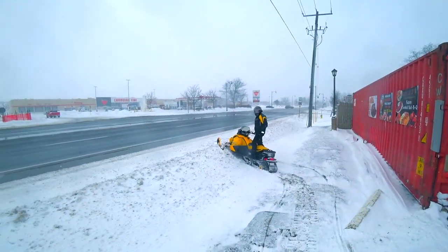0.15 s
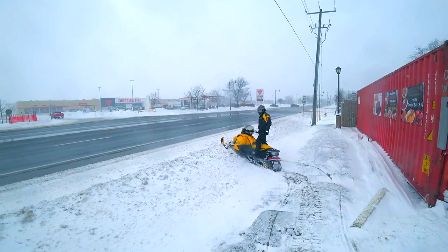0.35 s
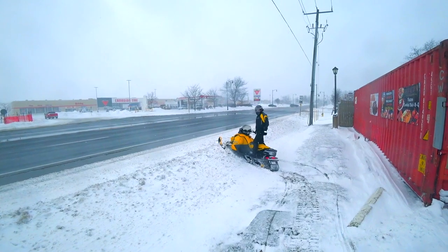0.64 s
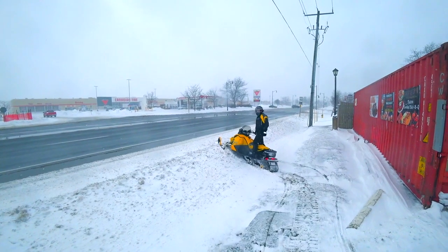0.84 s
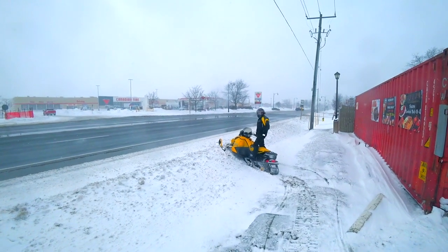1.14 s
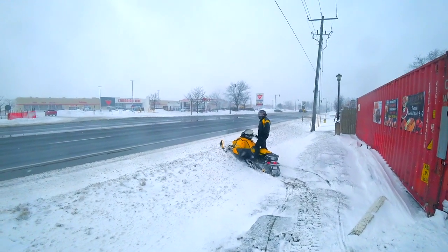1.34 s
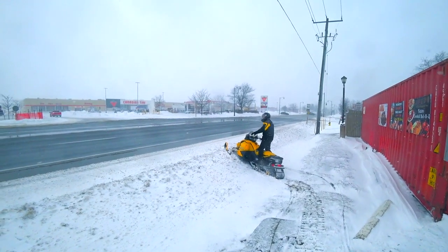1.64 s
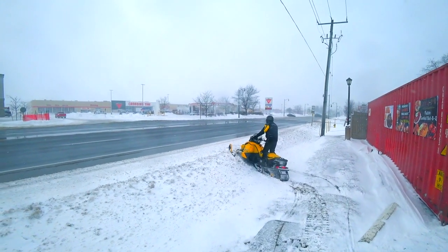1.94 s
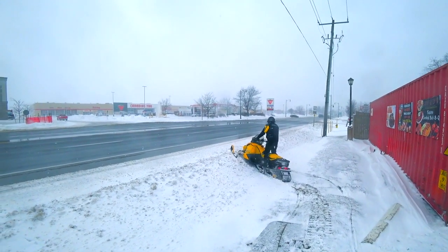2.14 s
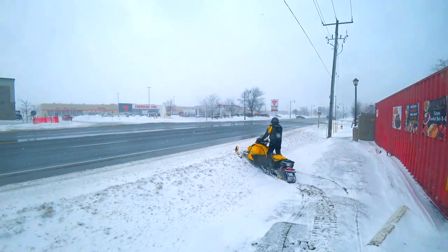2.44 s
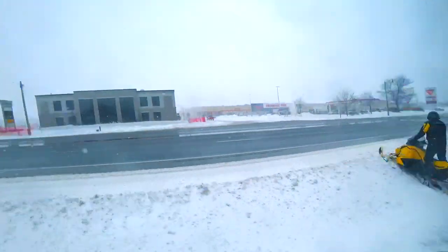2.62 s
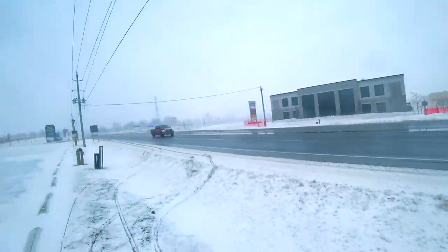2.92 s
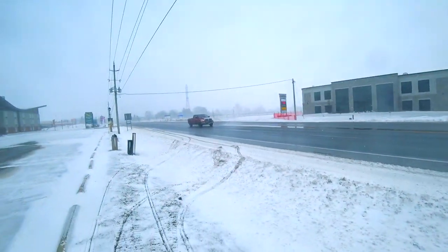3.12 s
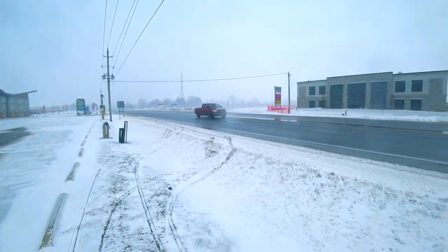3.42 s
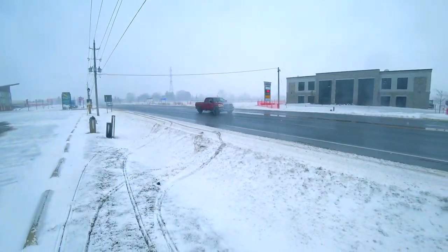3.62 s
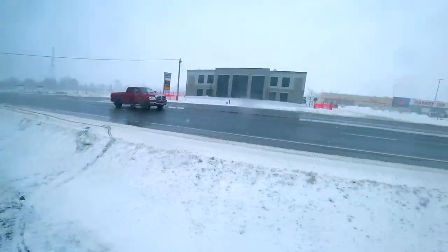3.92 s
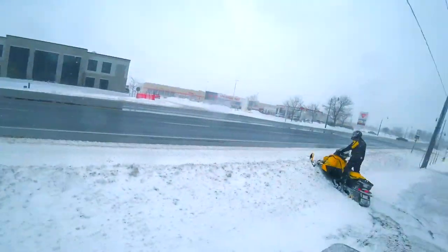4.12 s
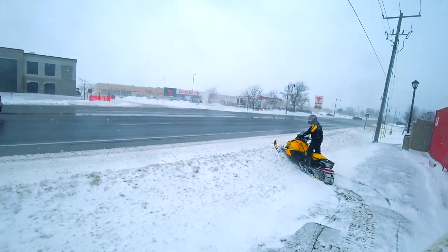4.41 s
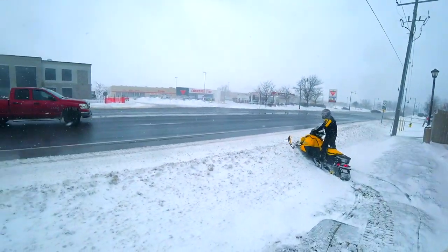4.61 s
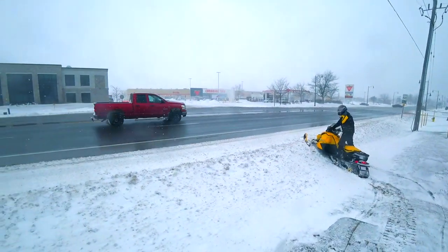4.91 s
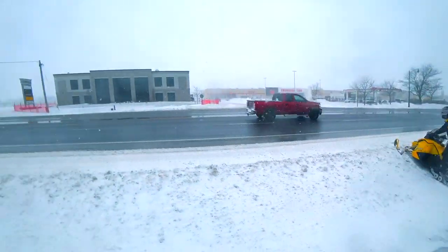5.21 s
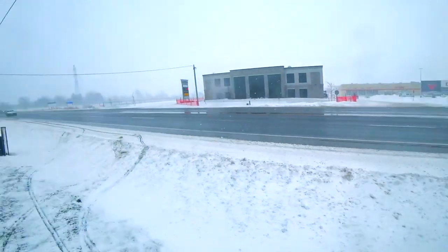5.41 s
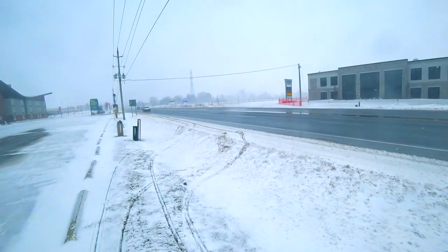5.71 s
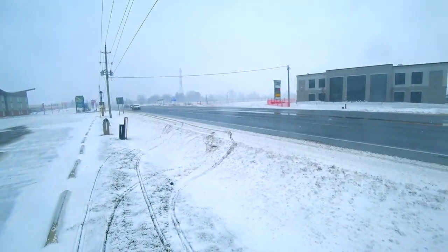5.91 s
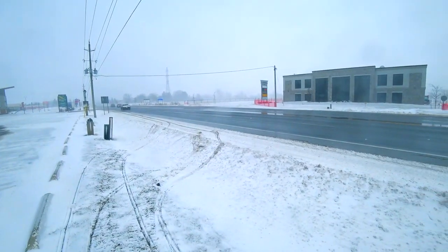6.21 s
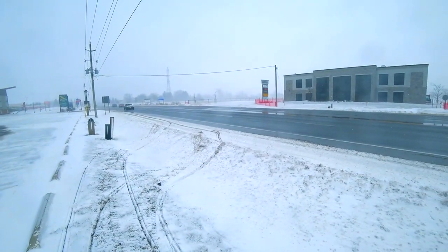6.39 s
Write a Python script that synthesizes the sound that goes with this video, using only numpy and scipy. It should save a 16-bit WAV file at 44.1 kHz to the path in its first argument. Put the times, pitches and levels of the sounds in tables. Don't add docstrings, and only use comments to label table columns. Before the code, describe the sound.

A two-stroke snowmobile engine idles throughout, a bassy thump about forty beats a second over a growling casing. Tyres hiss faintly on a wet, snowy road. The wearer's microphone sits under cloth: a rustle and sharp snap near 2.8 seconds briefly choke the sound, another cluster at 3.9 half covers it, and a last snap at 5.5 springs it open, brightest.

```python
import sys
import numpy as np
from scipy import signal
from scipy.fft import rfft, irfft, next_fast_len
from scipy.io import wavfile
from scipy.ndimage import uniform_filter1d, map_coordinates

SR = 44100
rng = np.random.default_rng(int(sys.argv[2]) if len(sys.argv) > 2 else 0)


def generate_wav(signal):
    frames = np.transpose(np.atleast_2d(signal))
    scaled = np.clip(frames, -1, 1) * 32767
    pcm = np.round(scaled).astype(np.int16)
    wavfile.write(sys.argv[1], SR, pcm)


def elevation(decibels):
    levels = np.asarray(decibels, float)
    return 10 ** (levels / 20)


N = 288855


def unit(x):
    return x / np.sqrt(np.mean(x ** 2) + 1e-20)


def along(points, hz):
    f, v = np.transpose(points)
    return np.interp(np.log(hz + 1), np.log(f + 1), v)


def curves(rows):
    s, *cols = np.transpose(rows)
    return [np.interp(np.arange(N) / SR, s, c) for c in cols]


def wobble(rate):
    knots = rng.standard_normal(int(N * rate / SR) + 4)
    return map_coordinates(knots, [np.arange(N) * rate / SR])


def filtered(x, response):
    m = next_fast_len(N + SR // 2)
    return irfft(rfft(x, m) * response(np.fft.rfftfreq(m, 1 / SR)), m)[..., :N]


def patches(shape, bands, frames):
    field = uniform_filter1d(rng.standard_normal(shape), bands, 0)
    return unit(uniform_filter1d(field, frames, 1))


def rush(spectrum, patchy_db):
    z = signal.stft(rng.standard_normal(N + 512), nperseg=512)[2]
    gain = elevation(patchy_db * patches(z.shape, 4, 12))
    noise = signal.istft(z * gain, nperseg=512)[1][:N]
    return unit(filtered(noise, lambda hz: elevation(along(spectrum, hz))))


def firings(turns):
    at = np.flatnonzero(np.diff(np.floor(turns)) > 0)
    luck = rng.standard_normal((len(at), 3))
    cylinder = (-1) ** np.arange(len(at))
    late = SR * (0.000058 * cylinder * (1 + wobble(1.5)[at]) + 0.00047 * luck[:, 0])
    weak_db = 1.7 * np.maximum(luck[:, 2] - 1.1, 0)
    size_db = 0.14 * cylinder + 0.8 * luck[:, 1] - weak_db
    pulses = np.zeros(N)
    pulses[np.clip(at + late, 0, N - 1).astype(int)] = elevation(size_db)
    return pulses


# (f/Hz, level/dB)
PIPE = [(12, -38.5), (25, -22.5), (40, -4), (80, 0), (120, 0.5), (160, -8.5), (200, -33), (280, -36),
        (470, -41), (900, -62.5), (2500, -120)]


def exhaust_thump(pulses):
    def pipe(hz):
        lead = np.exp(2j * np.arctan(23 / (hz + 1)) - 2j * np.pi * hz * 0.0009)
        return elevation(along(PIPE, hz)) * lead

    exhaust = filtered(pulses, pipe)
    thump = 0
    for k in range(1, 6):
        share = lambda hz: np.clip(1 - abs(np.clip(hz / 40.3, 1, 5) - k), 0, 1)
        thump = thump + elevation(1.7 * wobble(7)) * filtered(exhaust, share)
    return unit(thump)


# (multiple of the firing rate, level/dB re thump)
HUM = [(6, -29), (7, -29), (9, -34), (10, -28), (15, -38)]


def pipe_hum(turns):
    hum = 0
    for k, db in HUM:
        level = elevation(db + 1.3 * wobble(4))
        hum = hum + level * np.sin(2 * np.pi * k * turns + 0.35 * wobble(5))
    return hum


# (t/s, firings so far)
CRANK = [(-.022, -1), (.3478, 14), (.7231, 29), (1.2196, 49), (1.347, 54), (2.0943, 84), (2.338, 94),
         (2.7114, 109), (3.3396, 134), (3.4623, 139), (3.8373, 154), (4.4581, 179), (4.5853, 184),
         (4.7104, 189), (4.9547, 199), (6.0767, 244), (6.3291, 254), (6.5735, 264)]
# (t/s, level/dB over its usual idle)
EFFORT = [(0, -0.5), (.75, -1.5), (1.2, 0.04), (2.24, 0.5), (2.6, -1.5), (3.3, 1.5), (3.88, 1), (4.4, 1),
          (5.3, 0.2), (5.85, 0), (6.36, 1.5), (6.55, .5)]
# (f/Hz, level/dB per Hz)
GROWL = [(110, -41), (190, 2), (231, -2.5), (258, -6), (284, -1), (312, -4), (410, -8), (437, -9),
         (457, -8.5), (560, -15.5), (617, -14.5), (676, -16.5), (900, -31), (1170, -57.5), (1980, -120)]
# (f/Hz, level/dB per Hz)
RUMBLE = [(3, -18), (12, -10), (22, -3), (33, -2), (52, -5), (66, 0), (100, 0), (135, -6), (155, -2),
          (175, -11), (260, -30), (600, -120)]
# (f/Hz, level/dB per Hz)
ROAR = [(470, -1), (800, -2.5), (936, -5.5), (1170, -3), (2000, -17.5), (2600, -66.5), (4400, -120)]
# (open level/dB, half-covered level/dB, wide-open level/dB)
THUMP_IN = (4.24, -0.15, 4.47)
GROWL_IN = (4.35, 0.6, 5.9)


def engine():
    turns, = curves(CRANK)
    effort_db, = curves(EFFORT)
    thump_db = -17 + effort_db + let_in(THUMP_IN)
    own_db = -37 + 1.4 * effort_db + let_in(GROWL_IN) + 1.4 * wobble(5)
    growl_db = 10 * np.log10(elevation(2 * own_db) + elevation(2 * outside()[0]))

    pulses = firings(turns)
    rumble = elevation(-12 + 2.2 * wobble(4)) * rush(RUMBLE, patchy_db=0.9)
    low = exhaust_thump(pulses) + pipe_hum(turns) + rumble

    t = np.arange(1300) / SR
    swell = np.exp(-((t - 0.0115) / 0.0031) ** 2)
    puff = signal.fftconvolve(pulses, swell)[441:][:N]
    growl = unit(rush(GROWL, patchy_db=0.65) * (1.5 + 0.5 * puff) * elevation(0.25 * wobble(13)))
    bursts = 0.5 + puff ** 2 * elevation(2.1 * wobble(30))
    clatter = unit(rush(ROAR, patchy_db=1.5) * bursts)
    return elevation(thump_db) * low + elevation(growl_db - 0.3) * growl + elevation(growl_db - 17.5) * clatter


# (t/s, peak level/dB)
POPS = [(0.646, -32), (0.724, -38), (0.824, -37), (1.843, -34), (1.918, -36), (1.996, -35), (2.411, -35),
        (2.652, -29), (3.112, -34), (3.238, -27), (3.535, -26), (3.611, -30), (3.785, -28), (4.897, -32),
        (5.876, -27), (5.902, -28), (6.024, -26), (6.101, -28), (6.227, -26), (6.498, -29)]


def pops():
    kicks = np.zeros(N)
    for s, db in POPS:
        kicks[round((s + 0.001) * SR)] = elevation(db + 39)

    def mode(hz, centre_hz, width_hz):
        return 1j * hz * width_hz / (centre_hz ** 2 - hz ** 2 + 1j * hz * width_hz)

    def shell(hz):
        ring = mode(hz, 590, 150) + 0.07 * mode(hz, 1200, 500)
        return ring / (1 + (hz / 1150) ** 4)

    return filtered(kicks, shell)


# (t/s, roar level/dB)
TYRES = [(0, -58), (.25, -55), (.8, -55.5), (1.55, -52.5), (1.96, -51.5), (2.42, -53), (2.94, -51.5),
         (3.25, -48.5), (3.8, -50.5), (4.17, -47), (4.6, -49.5), (4.8, -56.5), (5.5, -52.5), (5.9, -50),
         (6.1, -52), (6.38, -47.5), (6.55, -55)]
# (t/s, hiss level/dB)
RUB = [(2.4, -80), (2.49, -60), (2.67, -50), (2.81, -50.5), (2.9, -69), (3.25, -65), (3.66, -55.5),
       (3.82, -55), (3.89, -48.5), (4.02, -56.5), (4.17, -63), (4.4, -68.5), (4.78, -55.5), (5.0, -56),
       (5.17, -53), (5.35, -51.5), (5.51, -48.5), (5.65, -63)]
# (open level/dB, half-covered level/dB, wide-open level/dB)
ROAD_IN = (5.8, 9.4, 10.6)
# (level/dB at usual tyre level, growth with the tyres, level/dB over the rubbing)
LAYERS = [
    (-58, 0.01, 13.5),
    (-55, 1.01, 8),
    (-70, 0.73, -0.3),
    (-74, 0.73, -8),
    (-78, 0.69, -19),
]


def outside():
    (tyres_db,), (rub_db,) = curves(TYRES), curves(RUB)
    near_db = tyres_db + let_in(ROAD_IN) + 54
    levels = []
    for db, grows, over_db in LAYERS:
        power = elevation(2 * (db + grows * near_db)) + elevation(2 * (rub_db + over_db))
        levels.append(10 * np.log10(power))
    return levels


# (f/Hz, level/dB per Hz)
HISS = [(900, -120), (1600, -13), (2000, -1), (3000, -1), (3800, -4.5), (4600, -13), (7000, -120)]
FIZZ = [(2000, -120), (3400, -10.5), (4200, 3), (5500, 1), (6600, -2), (7800, -16.5), (11000, -120)]
SPRAY = [(4000, -120), (6200, -8.5), (7300, 0), (9000, -3.5), (11000, -7.5), (11300, -120)]


def road():
    _, roar_db, hiss_db, fizz_db, spray_db = outside()
    flutter = wobble(19)
    roar = elevation(roar_db + 0.38 * flutter) * rush(ROAR, patchy_db=1.85)
    hiss = elevation(hiss_db + 0.56 * flutter) * rush(HISS, patchy_db=1.5)
    fizz = elevation(fizz_db + 0.49 * flutter) * rush(FIZZ, patchy_db=0.8)
    spray = elevation(spray_db + 0.6 * flutter) * rush(SPRAY, patchy_db=0.6)
    return roar + hiss + fizz + spray


# (t/s, peak level/dB, length/s, centre f/Hz, top f/Hz)
SNAPS = [(.7493, -44, .0006, 7000, 12500), (.7495, -40, .0012, 4300, 5200), (.76, -45, .00087, 5000, 11600),
         (2.8222, -34, .0012, 3500, 11500), (2.8244, -14, .00004, 4500, 16500),
         (2.832, -31, .0011, 2200, 12300), (3.887, -27.5, .0011, 3980, 12700),
         (3.8887, -23, .0018, 3000, 12700), (3.8921, -16, .00024, 2500, 12600),
         (3.894, -17, .0011, 1300, 12600), (4.073, -42, .0002, 8000, 13500),
         (4.1118, -32, .00006, 3500, 14500), (4.164, -46, .0002, 9000, 13000),
         (5.5389, -27, .00044, 3500, 11100), (5.540, -12, .00006, 4500, 11500),
         (5.5408, -27, .00004, 12000, 16500), (5.794, -37, .00076, 7000, 11000)]
# (t/s, peak level/dB,
# centre f/Hz)
TICKS = [(.746, -45, 4030), (1.0325, -45, 5080), (1.7235, -56, 3000), (2.8015, -40, 6000),
         (2.841, -39, 2000), (2.886, -43, 4000), (2.896, -50, 5000), (2.927, -43, 3000), (2.943, -42, 3000),
         (2.967, -41, 3000), (2.992, -41, 3000), (3.017, -42, 3000), (3.042, -46, 5000), (3.049, -52, 6000),
         (3.057, -45, 2500), (3.9125, -48, 4000), (4.069, -41, 7000), (5.5595, -40, 3000),
         (5.604, -44, 6000), (5.632, -47, 4940), (5.642, -42, 7400), (5.682, -43, 7900), (6.045, -43, 7000)]
# (t/s, peak level/dB, length/s, centre f/Hz)
SCUFFS = [(0.647, -49, .0009, 2000), (1.047, -47, .0008, 2500), (1.385, -39, 0.0023, 1300),
          (2.837, -40, 0.014, 1300), (5.55, -35, 0.014, 1220), (3.902, -35, 0.015, 1230),
          (3.983, -35, 0.00051, 1500), (3.996, -34, 0.0039, 1900), (4.006, -38, 0.002, 3000),
          (4.011, -33, 0.0058, 1930), (4.09, -38, 0.0009, 2000), (4.098, -32, 0.00088, 2500)]


def snaps():
    out = np.zeros(N + SR)
    t = np.arange(-600, 1800) / SR
    hz = np.fft.rfftfreq(len(t), 1 / SR)
    decay_s = np.where(t < 0, 0.012, 0.04)
    ring = elevation(-37 - 60 * abs(t) / decay_s) * np.sin(2 * np.pi * 11100 * t)
    ticks = [(s, db, 0.00012, centre_hz, 11000) for s, db, centre_hz in TICKS]
    scuffs = [(s, db, length, centre_hz, 1.3 * centre_hz) for s, db, length, centre_hz in SCUFFS]
    for s, db, length, centre_hz, top_hz in [*SNAPS, *ticks, *scuffs]:
        ratio = hz / centre_hz
        colour = ratio / (1 + ratio ** 2.18) / (1 + (hz / top_hz) ** 30)
        burst = rng.standard_normal(len(t)) * np.exp(-(t / max(length, 4e-5)) ** 2)
        if length < 0.00045:
            burst[600] += 3
        crackle = irfft(1j * rfft(burst) * colour, len(t))
        out[round(s * SR) - 600:][:len(t)] += elevation(db) * (crackle / abs(crackle).max() + ring)
    return out[:N]


# (f/Hz, rms level/dB)
WHINE = [(10002, -82.5)]


def whine():
    opened, _, wide = port_state()
    t = np.arange(N) / SR
    return sum(elevation(db + 4.0 - 9 * (opened + wide)) * np.sin(2 * np.pi * hz * t) for hz, db in WHINE)


# (t/s, open share, half-covered share, wide-open share)
OPEN = [
    (2.86, 0, 0, 0),
    (2.88, 1, 0, 0),
    (3.9, 1, 0, 0),
    (3.93, 0, 1, 0),
    (5.56, 0, 1, 0),
    (5.59, 0, 0, 1),
]


def port_state():
    return curves(OPEN)


def let_in(gains_db):
    return np.dot(gains_db, port_state())


# (touch t/s, shut t/s, reopen t/s, depth level/dB, closing time/s)
SEALS = [
    (2.806, 2.82, 2.872, 14.5, .014),
    (3.893, 3.893, 3.938, 19, .007),
    (5.513, 5.55, 5.587, 16, .009),
]


def seal():
    t = np.arange(N) / SR
    touch_share = 0.4
    bass_back_s, treble_back_s = 0.013, 0.007
    closing = lambda s, time: 1 - np.exp(-np.maximum(t - s, 0) / time)
    bass_db = treble_db = 0
    for touch, shut, reopen, db, time in SEALS:
        shut_share = closing(shut, time)
        bass_db = bass_db - db * shut_share * (1 - closing(reopen, bass_back_s))
        shade = touch_share * closing(touch, 0.0021) + (1 - touch_share) * shut_share
        treble_db = treble_db - db * shade * (1 - closing(reopen, treble_back_s))
    return bass_db, treble_db


def membrane_squeeze(bass_db):
    def push(hz):
        return (hz / 6) / (1 + (hz / 6) ** 2) * 1j / (1 + (hz / 80) ** 2)

    return filtered(-bass_db, push)


def cavity(x, peaks):
    return filtered(x, lambda hz: elevation(sum(db / (1 + (2 * (hz - c) / w) ** 2) for c, w, db in peaks)))


def band_dropouts(x, level):
    hz, _, z = signal.stft(x, SR, nperseg=1024)
    field = patches(z.shape, 4, 8)
    weak_bands = unit(uniform_filter1d(rng.standard_normal(z.shape[0]), 3)[:, None])
    lean_frames = unit(uniform_filter1d(rng.standard_normal(z.shape[1]), 5))
    bass_safe = (2000 / (hz[:, None] + 1)) ** 3
    need = field + 0.7 * weak_bands + 0.55 * lean_frames - bass_safe
    return signal.istft(z * np.where(need > level, 0.03, 1), nperseg=1024)[1][:N]


# (f/Hz, width f/Hz, level/dB)
MUFFLED = [(780, 100, 2), (1500, 930, -3.5), (2580, 220, 4), (3700, 210, 2), (4600, 270, 3), (5820, 420, 7)]
OPENED = [(249, 150, 2), (606, 200, -3.5), (2530, 200, 2.5), (3860, 430, 4.5), (4500, 300, 1.2),
          (5700, 280, 6)]
WIDE = [(244, 130, 4.2), (600, 250, -5.5), (1500, 410, 3), (2540, 390, 6), (3730, 220, 5), (4580, 560, 10),
        (6000, 700, 7), (7460, 200, 1)]


def port(x):
    opened, half, wide = port_state()
    half_covered = band_dropouts(half * cavity(x, MUFFLED), level=0.7)
    clothed = band_dropouts((1 - opened - half - wide) * x, level=2.1)
    return half_covered + opened * cavity(x, OPENED) + wide * cavity(x, WIDE) + clothed


def scene():
    bass_db, treble_db = seal()
    arriving = elevation(bass_db) * (engine() + pops()) + elevation(treble_db) * road()
    heard = port(arriving) + elevation(treble_db) * whine()
    return (heard + elevation(-41.5) * membrane_squeeze(bass_db) + snaps())[None]


def low_pass(x):
    return signal.sosfilt(signal.butter(12, 15820, fs=SR, output="sos"), x)


def record(dry):
    soft = dry / (1 + abs(dry / 1.05) ** 4) ** (1 / 4)
    return low_pass(soft)


dry = scene()
out = record(dry)
generate_wav(out)
```